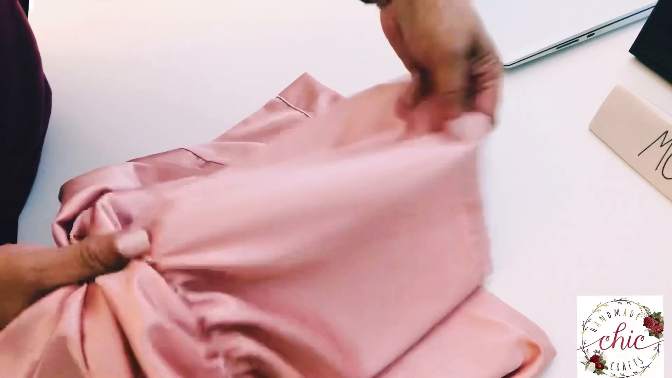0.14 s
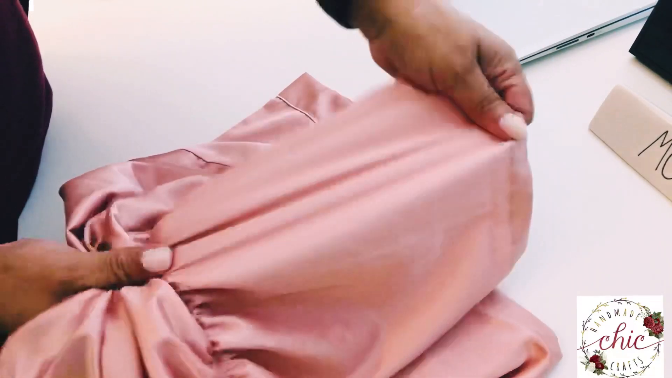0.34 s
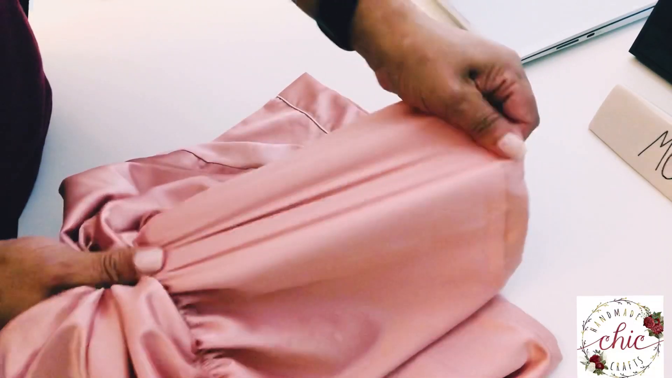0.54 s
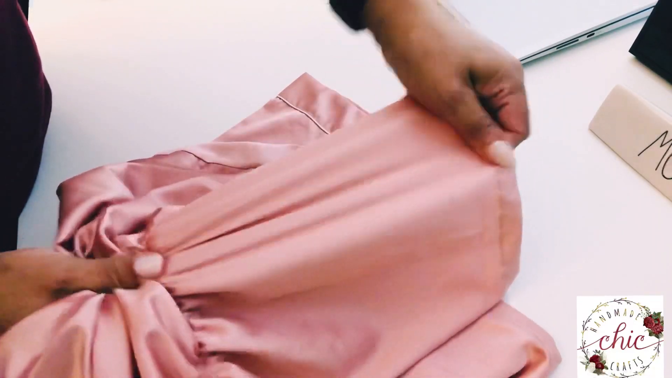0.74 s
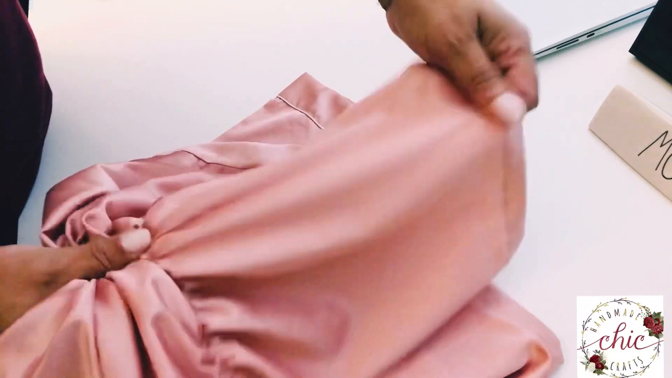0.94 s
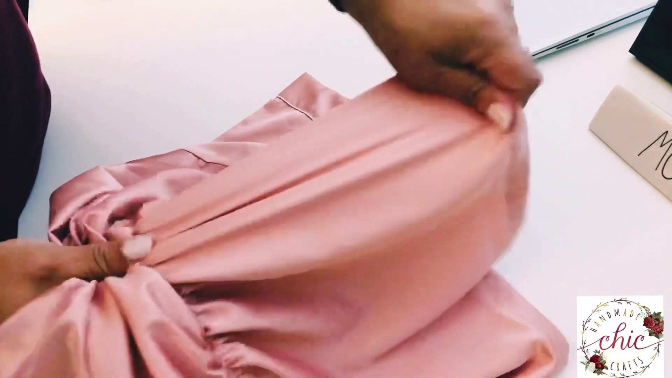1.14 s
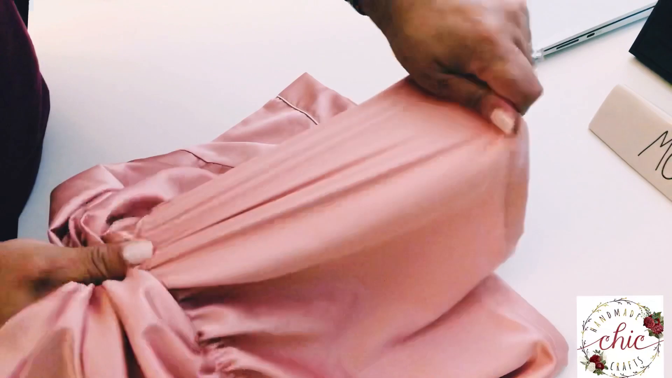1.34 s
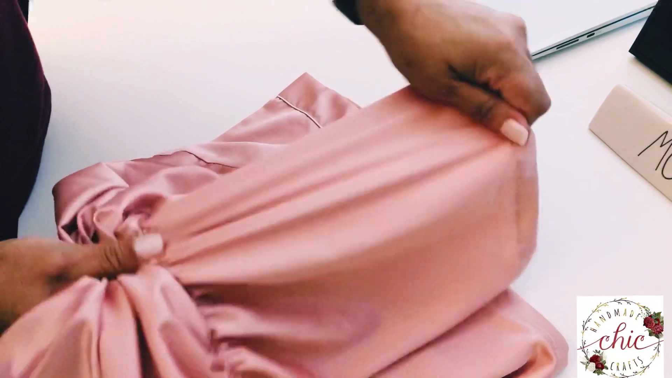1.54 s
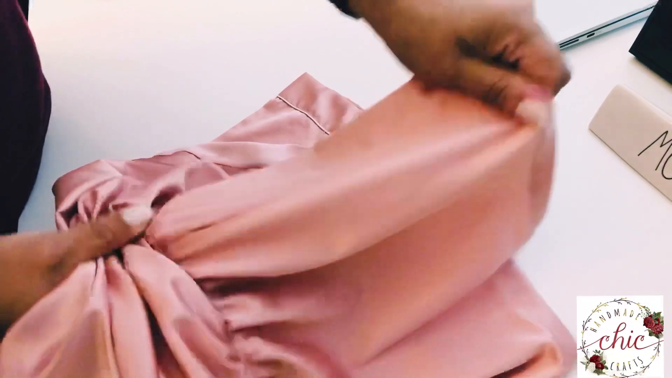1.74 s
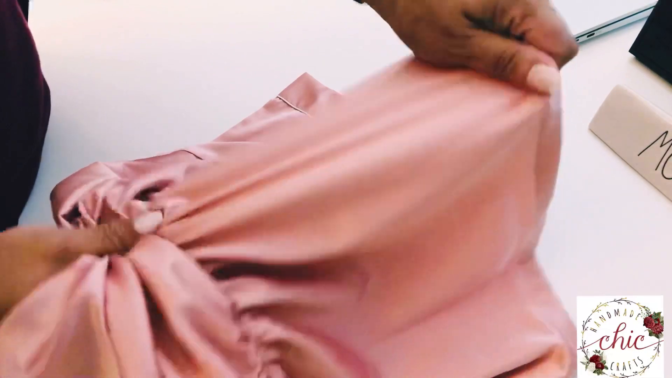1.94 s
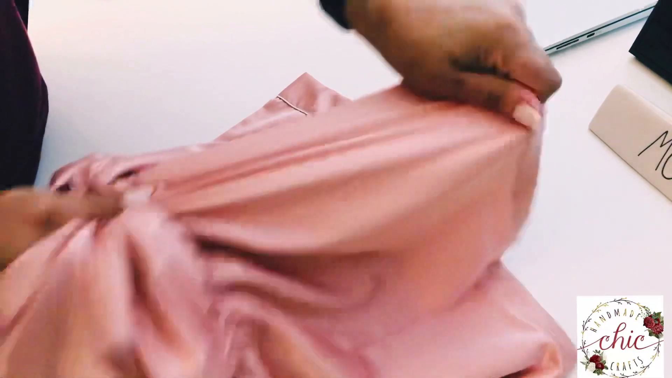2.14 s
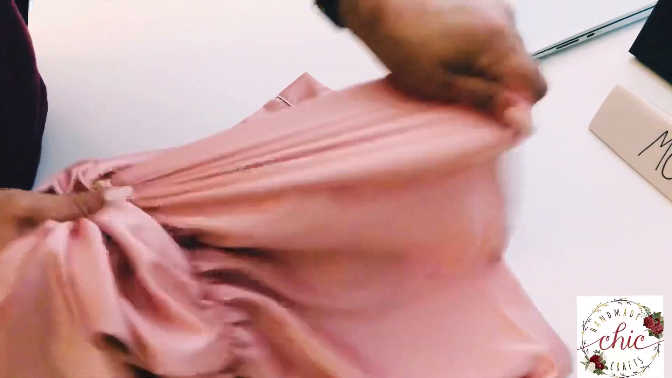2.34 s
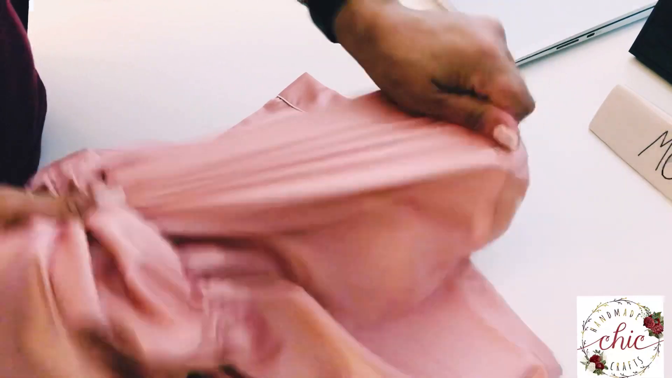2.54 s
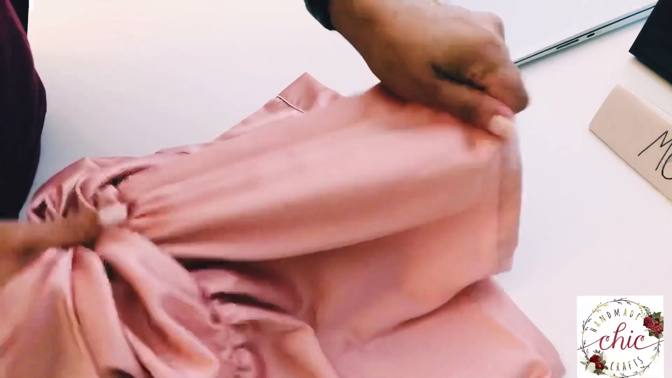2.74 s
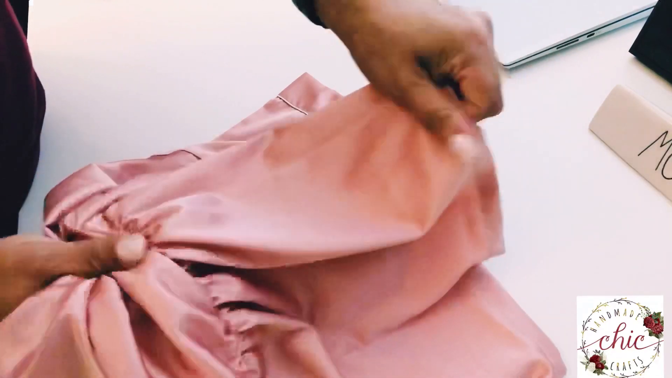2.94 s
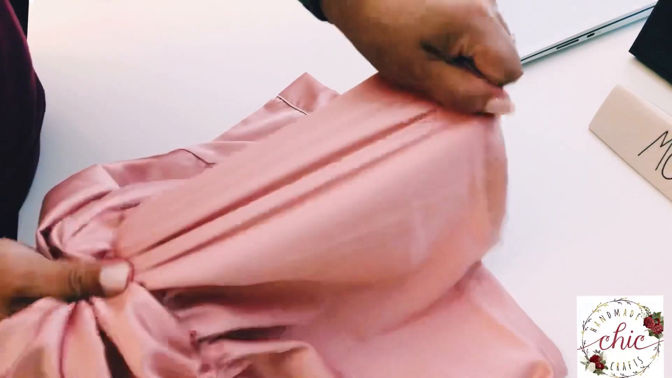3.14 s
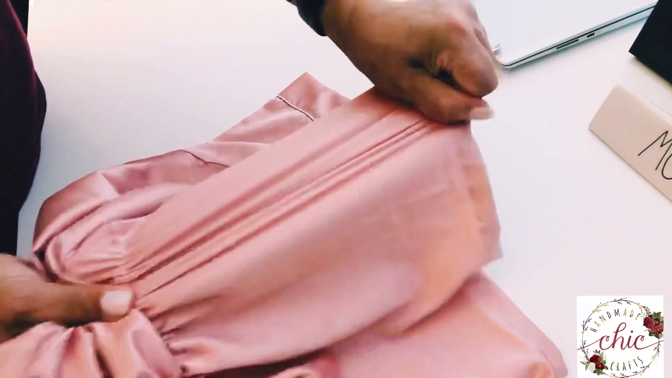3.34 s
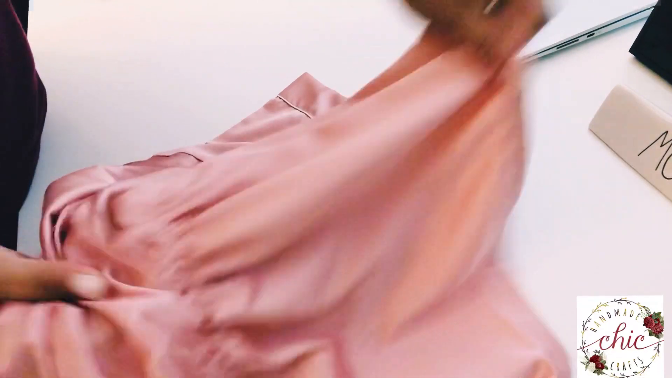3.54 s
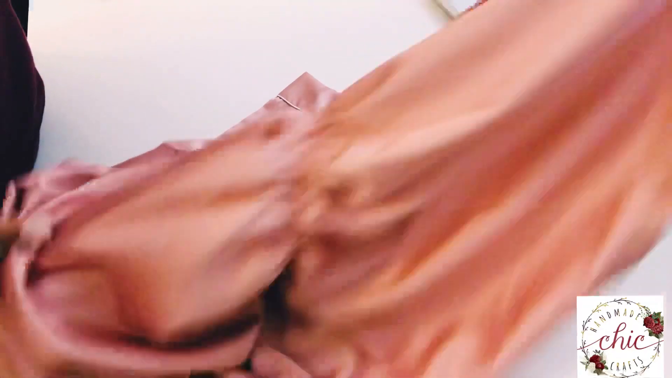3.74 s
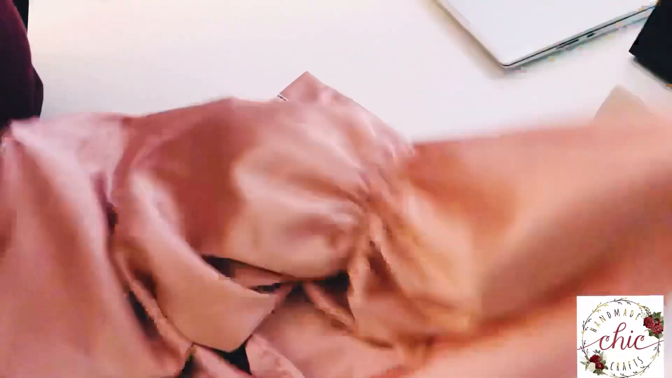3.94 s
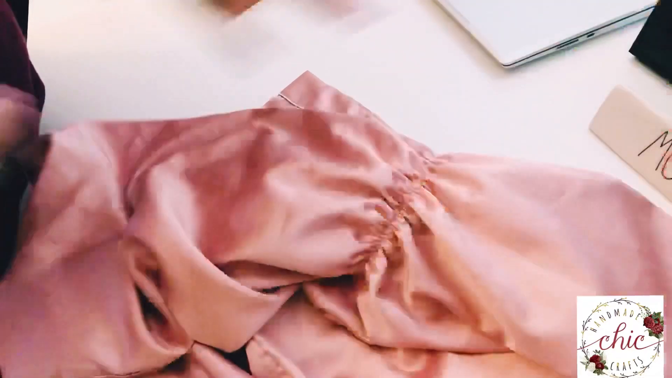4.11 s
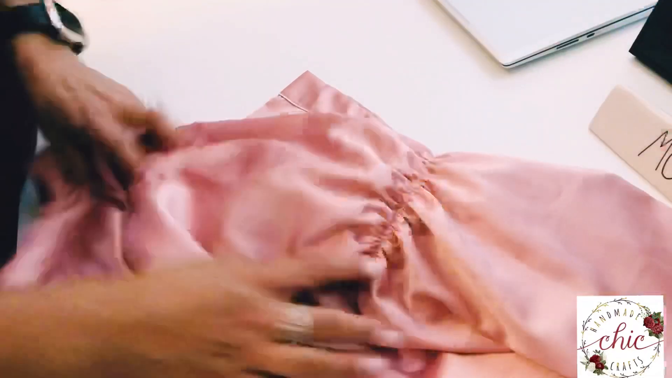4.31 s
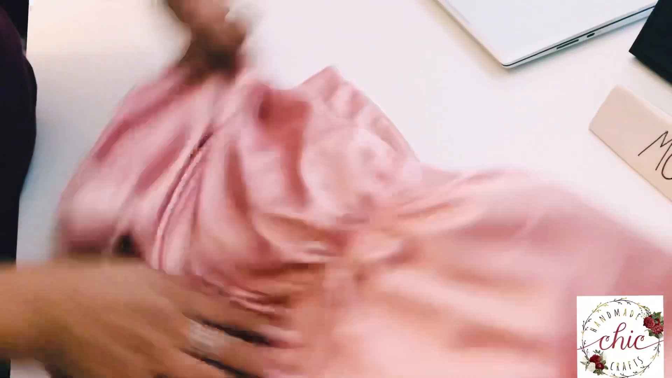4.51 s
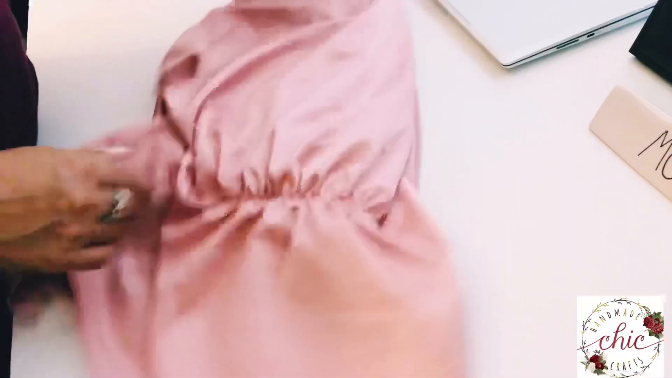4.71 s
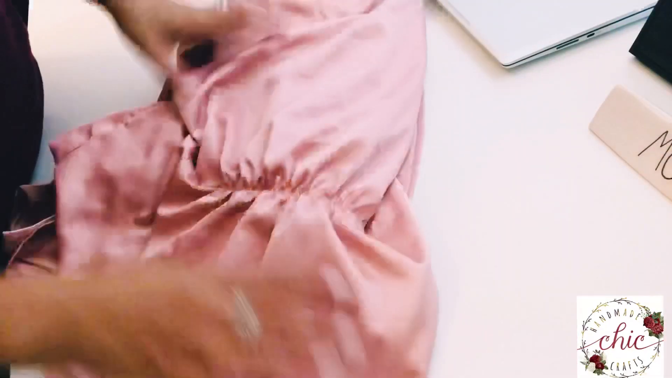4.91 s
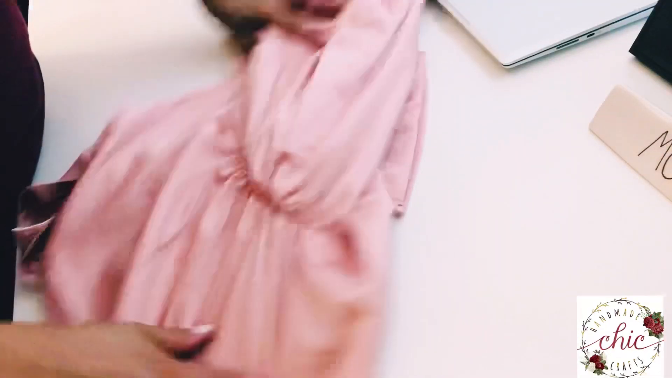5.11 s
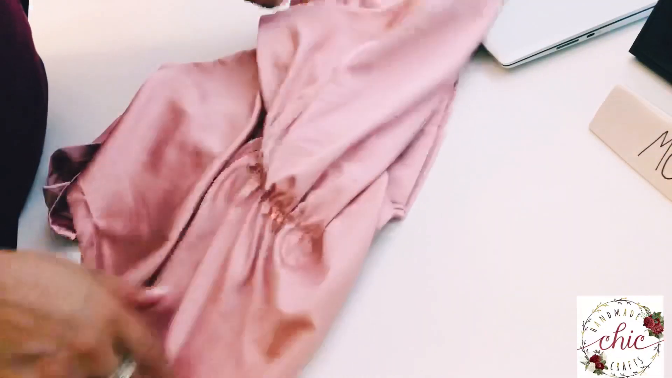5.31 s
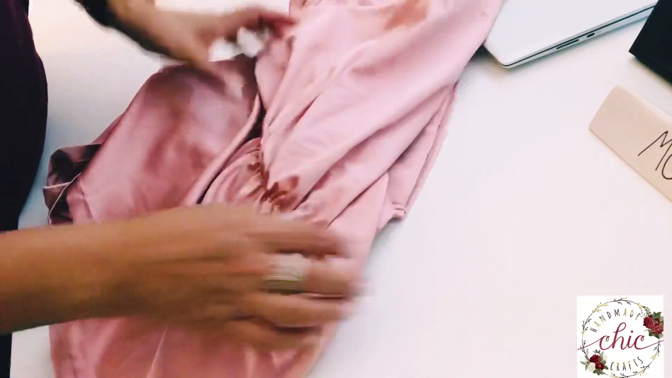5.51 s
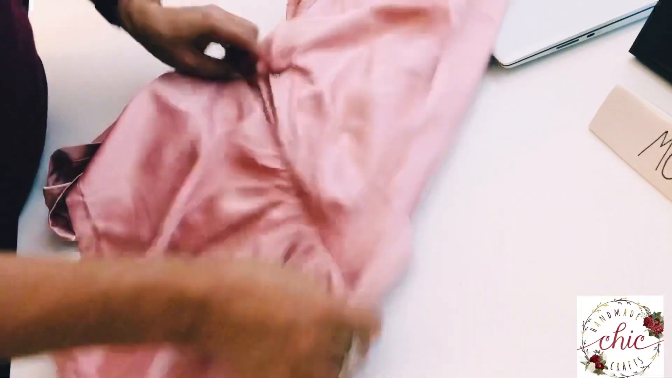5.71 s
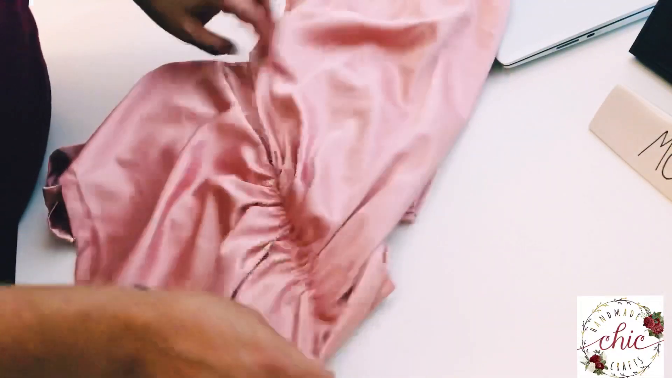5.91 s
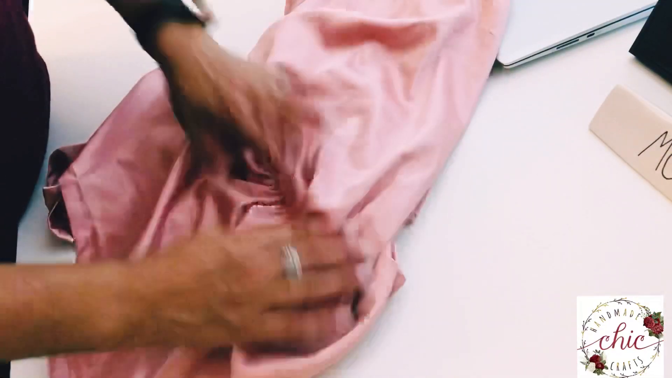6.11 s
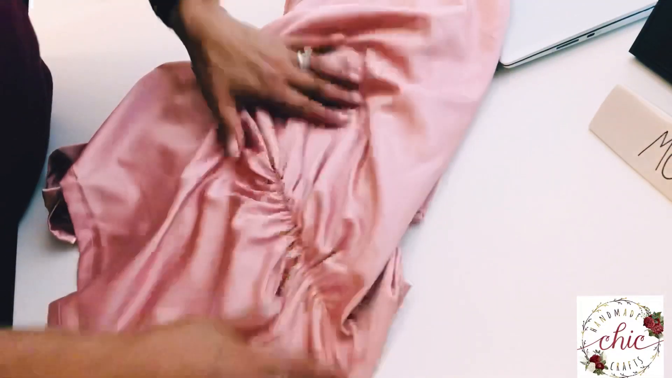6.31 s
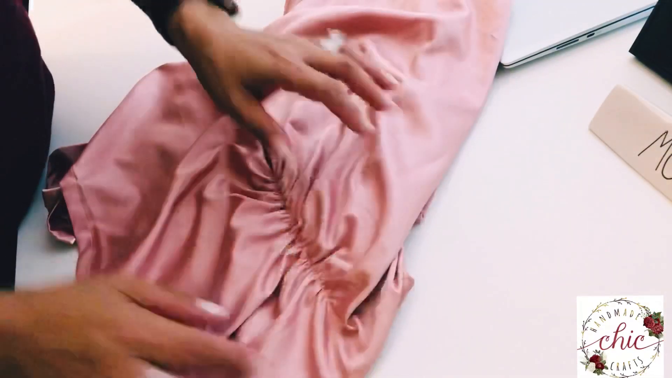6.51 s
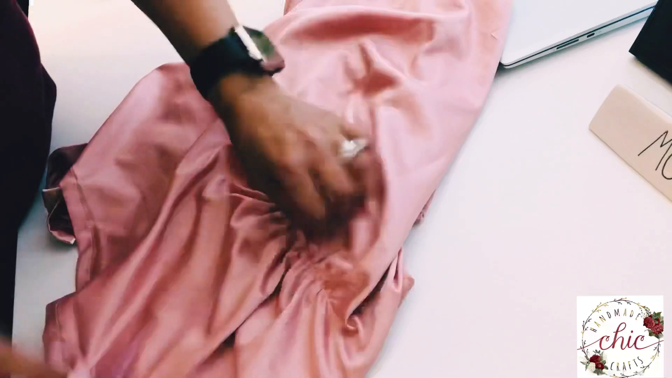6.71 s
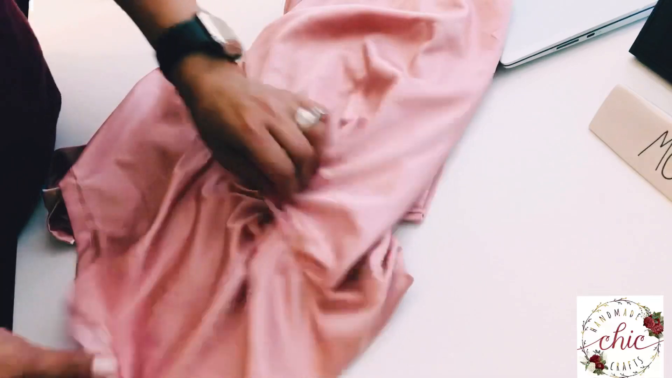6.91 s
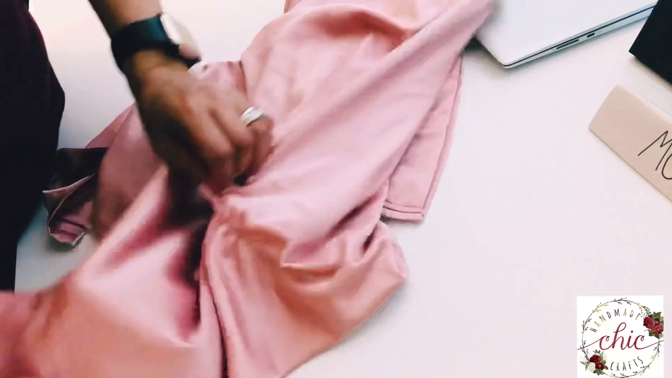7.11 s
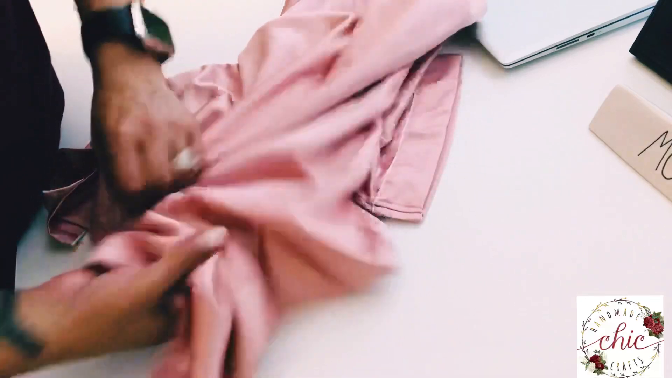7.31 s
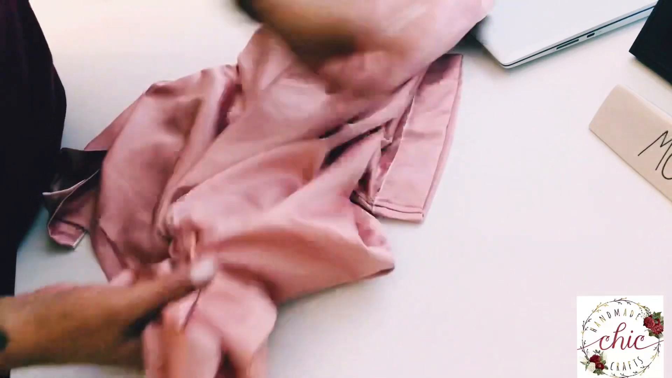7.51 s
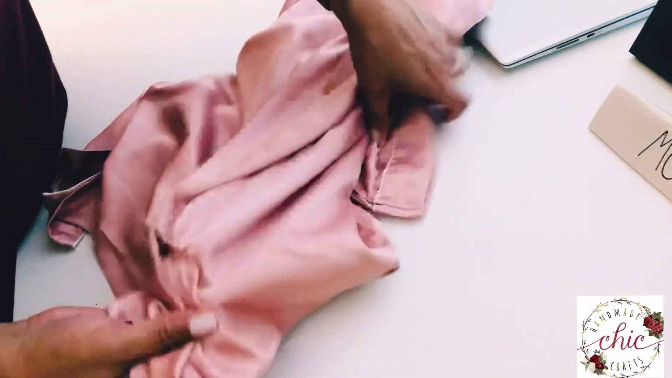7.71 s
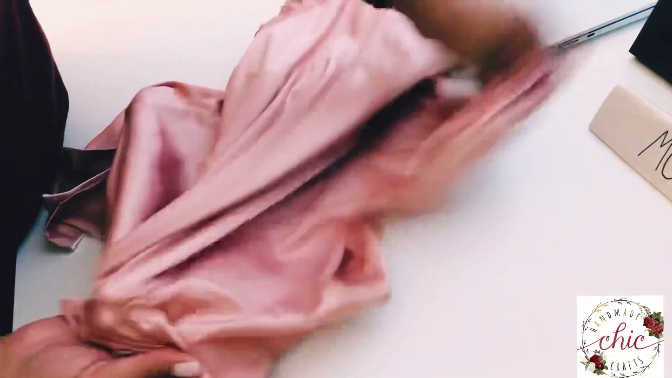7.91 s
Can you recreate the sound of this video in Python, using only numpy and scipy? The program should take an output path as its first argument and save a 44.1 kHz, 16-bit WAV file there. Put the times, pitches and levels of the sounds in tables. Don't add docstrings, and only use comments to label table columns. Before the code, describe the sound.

Satin cloth is tugged and swished across a hollow table, with two hard knocks early on and soft hand taps later.

```python
import sys
import numpy as np
from scipy import signal
from scipy.fft import rfft, irfft, next_fast_len
from scipy.io import wavfile
from scipy.ndimage import uniform_filter1d, map_coordinates

SR = 44100
rng = np.random.default_rng(int(sys.argv[2]) if len(sys.argv) > 2 else 0)


def put_to_file(sound):
    columns = np.atleast_2d(sound).T
    safe = np.clip(columns, -1, 1)
    whole_steps = np.round(safe * 32767)
    wavfile.write(sys.argv[1], SR, whole_steps.astype(np.int16))


def attenuation_scalar(level_db):
    decades = np.asarray(level_db, float) / 20
    return 10 ** decades


N = 350595

# freq_hz, density_db
AIR_SPECTRUM = [(20, -48), (35, -13), (60, -3.5), (110, -6), (220, -9), (400, -14.5), (900, -24.5),
                (2000, -31), (6500, -39), (14000, -38.5), (16000, -35)]
# freq_hz, width_hz, level_db
MOTORS = [(98, 20, -69), (123, 9.7, -67.5), (158, 8.1, -74.5), (312, 22, -72), (492, 27, -79)]
# top_s, rise_s, fall_s, rub_db, sheen_over_rub_db
STROKES = [(0.012, 0.031, 0.029, -61, -28), (0.13, 0.13, 0.18, -68.5, -4), (0.255, 0.042, 0.067, -62, -8),
           (0.422, 0.038, 0.068, -67, -7), (0.548, 0.12, .045, -69, -8), (0.75, 0.16, 0.2, -69.5, -3.5),
           (0.94, 0.083, 0.19, -71.5, -3), (1.182, 0.13, 0.051, -67, -7), (1.288, .03, .01, -79, -4),
           (1.5, 0.12, 0.52, -73.5, -3.5), (1.658, 0.023, 0.11, -65.5, -1), (1.925, 0.2, .055, -72, -2),
           (2.055, 0.045, 0.021, -63.5, -3), (2.17, 0.24, 0.075, -70.5, -8), (2.27, 0.067, 0.62, -69.5, -12),
           (2.465, 0.053, 0.14, -66.5, -13), (2.625, 0.13, 0.026, -72, -17), (2.75, 0.17, 0.18, -77, 3),
           (2.884, 0.26, 0.11, -70.5, -8), (3.02, 0.057, 0.073, -67, -6), (3.178, 0.095, 0.025, -70, -7),
           (3.24, 0.062, 0.19, -69, -3), (6.108, 0.023, .1, -62.5, -16), (7.5, 0.4, .15, -68.5, -8),
           (3.46, 0.044, 0.12, -59.5, -5.5), (3.63, 0.037, 0.18, -65.5, -12), (3.76, 0.17, 0.066, -59, -8.5),
          (3.95, 0.47, 0.18, -63.5, -14), (4.245, 0.0081, 0.51, -64.5, -13),
          (4.44, 0.18, 0.18, -59.5, -4.5), (4.534, 0.19, 0.15, -58, -7), (4.651, 0.17, 0.21, -62.5, -11),
          (5.04, 0.11, 0.12, -56, -10.5), (4.975, 0.05, 0.11, -66, -16), (5.16, 0.2, 0.14, -56, -7),
          (5.56, 0.11, .05, -75.5, -3), (5.61, 0.065, 0.24, -56.5, -16), (5.775, 0.074, 0.14, -61, -5),
          (6.135, 0.039, 0.16, -56.5, -7), (6.26, 0.14, 0.11, -61, 2), (6.68, 0.32, .1, -74, -10),
          (6.77, 0.12, 0.047, -62.5, -3), (6.86, 0.18, 0.13, -68, -16), (6.99, 0.096, 0.18, -61.5, -23),
          (7.104, 0.027, .15, -62.5, -13), (7.27, 0.19, 0.2, -61, -14), (7.655, 0.079, 0.14, -64.5, -8),
          (7.72, 0.033, 0.16, -59, -12), (7.935, 0.15, .04, -59, -9.5)]
# time_s, drag_db
HAND_WEIGHT = [(0, 0.5), (.7, 0), (1.3, 3.5), (2, -3.5), (2.5, 0.5), (3.1, -0.5), (3.7, 1.5), (4.3, 2),
               (4.8, -1.5), (5.2, -2), (5.7, -5.5), (6.16, 2.5), (6.5, 1), (6.95, -5), (7.3, 0), (7.95, -2)]
# freq_hz, density_db
RUB_SPECTRUM = [(500, -28), (1000, -1), (1700, -0.5), (3000, -2), (4400, -4), (6000, -9.5), (8000, -13),
                (12000, -14)]
# freq_hz, density_db
SHEEN_SPECTRUM = [(2500, -32), (5000, -8), (8000, -10), (12000, -7), (16000, -4.5)]
# freq_hz, density_db
DRAG_SPECTRUM = [(120, -24), (300, -3), (600, -3.5), (1100, -6), (2000, -21), (4000, -34)]
# start_s, length_s, start_hz, end_hz, level_db
SQUEAKS = [
    (.0195, 0.008, 2000, 2010, -57.5),
    (4.481, 0.094, 2890, 1730, -66.5),
    (4.75, 0.23, 2130, 2070, -83),
    (5.07, 0.091, 2280, 1880, -75),
    (5.004, 0.12, 4120, 4400, -75),
    (5.14, 0.12, 1000, 943, -75),
]
# start_s, length_s, start_hz, end_hz, level_db
MORE_SQUEAKS = [
    (5.03, 0.079, 2500, 2350, -70),
    (4.3, 0.039, 1400, 2300, -68),
    (5.14, 0.092, 1800, 1480, -72),
    (4.6, .13, 3700, 5100, -74),
    (5.17, .07, 760, 1100, -69),
    (4.51, 0.043, 2000, 1750, -66),
    (4.41, .05, 1400, 1100, -68),
    (6.5, .09, 1900, 2000, -82),
    (4.76, .1, 2120, 1500, -81),
]
# start_s, peak_db, mode_hz, thud_over_peak_db
TAPS = [(0.107, -51, 312, -8), (0.127, -48.5, 200, -20), (0.347, -57, 240, -9), (1.923, -47.5, 300, -28),
        (3.008, -43, 300, -16), (3.019, -42.5, 380, 1), (3.483, -55, 312, -14), (4.35, -46.5, 202, -14),
        (4.358, -47.5, 202, 8.5), (4.555, -41, 390, -2), (4.957, -48.5, 600, 7), (4.975, -45, 253, 9),
        (5.756, -42, 281, 4), (5.771, -43.5, 203, 3), (5.781, -39.5, 600, -2), (6.127, -45, 242, 3.5),
        (6.138, -47, 210, -3), (6.166, -39.5, 323, 3), (6.175, -38.5, 520, -4), (6.706, -35.5, 348, -18),
        (6.722, -34, 636, -22), (6.730, -31.5, 241, 0.5), (6.742, -36.5, 282, -8), (7.696, -47, 280, -22)]
# start_s, peak_db, mode_hz, thud_over_peak_db, spread_oct
KNOCKS = [(2.2914, -27.5, 950, -2, 0.13), (2.2969, -18.5, 965, -32, 0.33), (2.2965, -16, 420, -24, 0.19),
          (2.2991, -17.5, 890, -45, 0.46), (2.3043, -30, 174, -40, 0.2), (2.311, -34, 910, -27, 0.19),
          (2.327, -38, 500, -14, .58), (2.474, -42, 400, -8, 1), (2.4801, -34, 2000, -23, 0.56),
          (2.482, -28, 497, -15, 0.74), (2.4831, -20, 900, -12.5, 0.8), (2.4841, -18, 477, -21, 0.39),
          (2.488, -21, 876, -7, 0.29), (2.492, -28, 285, -6.5, 0.44), (3.025, -40.5, 700, -28, 0.49),
          (3.1987, -38.5, 780, -11, 0.077), (4.2372, -55, 1000, -18, 0.22), (7.674, -47, 748, -19, 0.39),
          (6.168, -41.5, 1020, -22, 0.24), (5.783, -47, 1320, -20, 0.35)]
# start_s, flesh_peak_db, flesh_mode_hz, metal_over_flesh_db, metal_mode_hz
RINGED = [
    (5.574, -37.5, 347, -9, 1000),
    (6.6938, -38.5, 300, -12, 1200),
    (6.7133, -27.5, 305, -9.5, 1090),
    (7.18, -35.5, 318, -4, 830),
    (7.635, -32, 274, -14, 620),
    (7.71, -38.5, 338, -4, 655),
    (7.934, -43.5, 350, 2.5, 970),
]
# start_s, peak_db, centre_hz, t60_s
TICKS = [(0.346, -47.5, 1000, 0.02), (.971, -58, 11000, .006), (1.505, -60, 9000, .006),
         (1.587, -53, 6000, 0.0063), (2.2906, -33, 2500, 0.017), (2.2948, -32, 3180, 0.016),
         (2.299, -32, 1700, 0.027), (2.482, -28, 3000, 0.014), (2.488, -27, 3800, 0.005),
         (2.4904, -32.5, 2180, 0.015), (2.729, -66, 6000, .005), (3.017, -53, 2500, .008),
         (3.1991, -38.5, 12000, 0.018), (3.1998, -34.5, 4900, 0.0045), (4.237, -52, 5240, 0.018),
         (5.574, -37.5, 7500, 0.012), (5.5741, -40.5, 1400, 0.021), (5.782, -41, 4500, 0.0092),
         (6.125, -46, 1500, 0.015), (6.693, -45, 2500, 0.013), (6.7003, -43, 9000, 0.012),
         (6.713, -33, 12000, 0.011), (7.635, -39, 11000, 0.016), (7.711, -45, 5000, 0.0057),
         (7.934, -56, 2500, .008), (6.808, -49, 1494, .01), (7.612, -56, 4000, .04),
         (2.298, -36, 3360, 0.0096), (3.023, -50, 1900, .02), (2.483, -48, 13000, .015),
         (6.701, -50, 4200, .012), (7.697, -50, 1200, .006), (7.736, -58, 12000, .004),
         (6.757, -53, 2200, 0.033), (3.2017, -43, 3000, .01)]
# freq_hz, level_db, ring_time_share
BOARD_MODES = [(224, 2, 0.26), (300, -2.5, 0.74), (380, -4, 0.88), (456, 0.5, 0.74), (523.3, 1, 1),
               (600, 2.5, 1), (662, 3, 1), (793, 8.5, 0.6), (884, 2, 0.94), (950, 3, 0.86),
               (1070, 14, 0.31), (1200, 6, 0.48), (1530, 19, 0.35), (1774, 16.5, 0.23), (2000, 12, 0.18),
               (420, -13, 1), (171, -13, 0.87)]
# freq_hz, level_db, t60_s
FRAME_MODES = [(68, -2, 0.019), (105, 7.5, 0.043), (156.6, 1, 0.076)]
# freq_hz, t60_s
WALL_DECAY = [(150, 0.32), (600, 0.22), (2000, 0.2), (5000, 0.084), (12000, 0.23)]
# start_s, length_s, level_db, lower_link_hz, upper_link_hz
JINGLES = [
    (5.574, 0.014, -48.5, 4300, 6140),
    (6.7128, 0.0044, -41, 5740, 4360),
    (6.726, 0.013, -52, 4560, 6400),
    (6.732, 0.013, -47.5, 5550, 7000),
    (6.741, 0.011, -48.5, 4500, 5950),
    (6.752, 0.011, -47, 4650, 8000),
    (7.636, 0.018, -48.5, 4900, 7350),
    (7.712, 0.0072, -56, 4500, 6500),
]
# freq_hz, gain_db
MIC_COLOUR = [(20, -57), (45, -2), (70, 0.5), (7800, -1), (8200, -4.5), (15750, -9), (15900, -47)]

EDGE_DB, ROUNDNESS, REST_DB = 15, 1.44, -96
DRAG_DB, DRAG_GROWTH = -68, 0.63
CRACKLE_PER_S, CRACKLE_OVER_RUB_DB, CRACKLE_SPREAD_DB = 260, 5, 4
PITCH_WANDER, GLIDE_WANDER, STEADY_S = 0.042, 0.19, 0.06
FLESH_AFTER_S, FLESH_THUD_DB, METAL_THUD_DB = 0.00253, -15.5, -31
FLESH_RING_S, KNOCK_RING_S, METAL_RING_S = 0.056, 0.053, 0.096
RING_TILT = -0.54
SPREAD_OCT, SPREAD_TILT, METAL_SPREAD_OCT = 0.6, -0.4, 0.27
LINK_WIDTH, UPPER_DB, CLASP_HZ, CLASP_DB = 0.09, -6, 11000, -12.5


def unit(x):
    return x / np.sqrt(np.mean(x ** 2) + 1e-20)


def along(points, hz):
    f, v = np.transpose(points)
    return np.interp(np.log(hz + 1), np.log(f + 1), v)


def filtered(x, response):
    m = next_fast_len(len(x) + 8192)
    return irfft(rfft(x, m) * response(np.fft.rfftfreq(m, 1 / SR)), m)[:len(x)]


def causal(points, size):
    cepstrum = irfft(np.log(attenuation_scalar(along(points, np.fft.rfftfreq(size, 1 / SR)))))
    cepstrum[1:size // 2] *= 2
    cepstrum[size // 2 + 1:] = 0
    return irfft(np.exp(rfft(cepstrum)))


def wobble(rate_hz):
    knots = rng.standard_normal(int(N * rate_hz / SR) + 4)
    return map_coordinates(knots, [np.arange(N) * rate_hz / SR])


def rush(spectrum, patchy_db):
    z = signal.stft(rng.standard_normal(N), nperseg=512)[2]
    field = uniform_filter1d(rng.standard_normal(z.shape), size=5, axis=0)
    field = uniform_filter1d(field, size=8, axis=1)
    x = signal.istft(z * attenuation_scalar(patchy_db * unit(field)), nperseg=512)[1][:N]
    return unit(filtered(x, lambda hz: attenuation_scalar(along(spectrum, hz))))


def add(track, start_s, sound):
    part = track[round(start_s * SR):][:len(sound)]
    part += sound[:len(part)]


def motor_tone(centre_hz, width_hz):
    noise = rng.standard_normal(N)
    return unit(filtered(noise, lambda f: 1 / (1 + ((f - centre_hz) / width_hz * 2) ** 2)))


def room_tone():
    air = attenuation_scalar(-62 + 0.5 * wobble(3)) * rush(AIR_SPECTRUM, patchy_db=0.6)
    motors = sum(attenuation_scalar(db) * motor_tone(hz, width_hz) for hz, width_hz, db in MOTORS)
    return air + motors


def strokes():
    t = np.arange(0, N, 96)[:, None] / SR
    top_s, rise_s, fall_s, rub_db, sheen_db = np.transpose(STROKES)
    away = np.abs(t - top_s) / np.where(t < top_s, rise_s, fall_s)
    rub = attenuation_scalar(2 * (rub_db - EDGE_DB * away ** ROUNDNESS))
    levels = []
    for power in (rub, rub * attenuation_scalar(2 * sheen_db)):
        level_db = 10 * np.log10(power.sum(axis=1) + attenuation_scalar(2 * REST_DB))
        levels.append(np.interp(np.arange(N) / SR, t[:, 0], level_db))
    return levels


def cloth():
    rub_db, sheen_db = strokes()
    weight_db = np.interp(np.arange(N) / SR, *np.transpose(HAND_WEIGHT))
    drag_db = DRAG_DB + DRAG_GROWTH * (rub_db + 67) + weight_db
    folds = attenuation_scalar(1.2 * wobble(25) + 0.7 * wobble(120))
    rub = attenuation_scalar(rub_db - 0.4) * rush(RUB_SPECTRUM, patchy_db=1.4)
    sheen = attenuation_scalar(sheen_db + 6) * rush(SHEEN_SPECTRUM, patchy_db=1)
    drag = attenuation_scalar(drag_db) * rush(DRAG_SPECTRUM, patchy_db=4)
    return folds * (rub + sheen + drag)


def crackle():
    happens = rng.random(N) < CRACKLE_PER_S / SR
    sign = np.sign(rng.standard_normal(N))
    size = attenuation_scalar(CRACKLE_SPREAD_DB * np.minimum(rng.exponential(size=N), 2))
    colour = causal(RUB_SPECTRUM, size=512)[:200]
    snaps = signal.fftconvolve(happens * sign * size, colour / np.linalg.norm(colour))[:N]
    return attenuation_scalar(strokes()[0] + CRACKLE_OVER_RUB_DB) * snaps


def squeaks(table):
    out = np.zeros(N)
    for start_s, length_s, hz0, hz1, db in table:
        n = min(round(length_s * SR), 12000)
        wander = unit(uniform_filter1d(rng.standard_normal((2, 12000)), size=90))[:, :n]
        wander = wander * min(1, length_s / STEADY_S)
        depth_hz = PITCH_WANDER * hz0 + GLIDE_WANDER * abs(hz1 - hz0)
        hz = np.linspace(hz0, hz1, n) + depth_hz * (wander[0] - wander[0].mean())
        tone = np.sin(2 * np.pi * np.cumsum(hz) / SR)
        add(out, start_s, attenuation_scalar(db + 8.5 + 5.8 * wander[1]) * np.hanning(n) * tone)
    return out


def contacts():
    def soft_oct(hz):
        return SPREAD_OCT * (hz / 300) ** SPREAD_TILT

    knocks = [(*row, KNOCK_RING_S) for row in KNOCKS]
    taps = [(*row, soft_oct(row[2]), FLESH_RING_S) for row in TAPS]
    metal, flesh = [], []
    for s, db, flesh_hz, over_db, metal_hz in RINGED:
        metal.append((s, db + over_db, metal_hz, METAL_THUD_DB, METAL_SPREAD_OCT, METAL_RING_S))
        flesh.append((s + FLESH_AFTER_S, db, flesh_hz, FLESH_THUD_DB, soft_oct(flesh_hz), FLESH_RING_S))
    return knocks + taps + metal + flesh


def board_blows():
    hits, t = np.zeros(N + SR), np.arange(SR // 8) / SR
    hz, mode_db, share = np.transpose(BOARD_MODES)[:, :, None]
    low_hz, low_db, low_t60 = np.transpose(FRAME_MODES)[:, :, None]
    frame = attenuation_scalar(low_db - 60 * t / low_t60) * np.sin(2 * np.pi * low_hz * t)
    thud = np.sum(frame, axis=0) * (1 - np.exp(-t / 0.0098))
    swell = 1 - np.exp(-t * hz / 0.65)
    for start_s, db, spot_hz, thud_db, spread_oct, ring_s in contacts():
        t60 = ring_s * (spot_hz / 300) ** RING_TILT
        scatter_db = rng.normal(0, 2.5, hz.shape)
        away = np.log2(hz / spot_hz) / max(spread_oct, 0.08)
        spot_db = -30 * np.log10(1 + away ** 2) + scatter_db
        decay = attenuation_scalar(mode_db + spot_db - 60 * t / (t60 * share))
        ring = -np.sum(swell * decay * np.sin(2 * np.pi * hz * t), axis=0)
        add(hits, start_s, attenuation_scalar(db + 1) * (ring / np.abs(ring).max() + attenuation_scalar(thud_db) * thud))
    return hits


def walls(x, chance):
    hz, t, z = signal.stft(chance, SR, nperseg=256)
    decay = attenuation_scalar(-60 * t / along(WALL_DECAY, hz)[:, None])
    tail = signal.istft(z * decay, SR, nperseg=256)[1]
    return signal.fftconvolve(np.pad(x, (260, 0)), tail / np.linalg.norm(tail))


def with_room(hits):
    answer = np.zeros(N + SR)
    step = SR // 10
    for start in range(0, N, step):
        piece = hits[start:start + 2 * step] * signal.get_window("hann", 2 * step)
        chance = rng.standard_normal(SR // 3)
        if np.abs(piece).max() > 1e-5:
            add(answer, start / SR, attenuation_scalar(-11.5) * walls(piece, chance))
    return (hits + answer)[:N]


def ticks():
    hits, t = np.zeros(N + SR), np.arange(900) / SR
    for start_s, db, hz, t60 in TICKS:
        burst = rng.standard_normal(900) * attenuation_scalar(-60 * t / t60)
        burst[0] = 3.26
        points = [(hz / 8, -22), (hz / 5.5, -4), (hz, 0), (hz * 1.12, -5), (hz * 4, -22)]
        tick = np.convolve(burst, causal(points, size=512)[:200])
        add(hits, start_s, attenuation_scalar(db) * tick / np.abs(tick).max())
    return hits


def strap():
    out = np.zeros(N)
    for start_s, length_s, db, low_hz, high_hz in JINGLES:
        u = np.arange(2000) / (length_s * SR)
        links = rng.standard_normal(2000)
        chatter = links * np.abs(links) * np.clip(1 - u, 0, 1) ** 0.3
        modes = [(low_hz, 0), (high_hz, UPPER_DB), (CLASP_HZ, CLASP_DB)]

        def metal(f):
            total = 0
            for k, (hz, gain_db) in enumerate(modes):
                loss = 1j * f * hz * LINK_WIDTH
                total = total + (-1) ** k * attenuation_scalar(gain_db) * loss / (hz * hz - f * f + loss)
            return total

        add(out, start_s, attenuation_scalar(db + 4) * filtered(chatter, metal))
    return out


def scene():
    mix = cloth() + squeaks(SQUEAKS)
    mix += with_room(board_blows() + ticks())
    mix += strap() + room_tone()
    mix += squeaks(MORE_SQUEAKS) + crackle()
    return mix[None]


def band_limit(x):
    return signal.sosfilt(signal.butter(12, 16370, fs=SR, output="sos"), x)


def record(dry):
    mix = signal.fftconvolve(dry[0], causal(MIC_COLOUR, size=8192))[None, :N]
    return band_limit(mix)


dry = scene()
out = record(dry)
put_to_file(out)
```